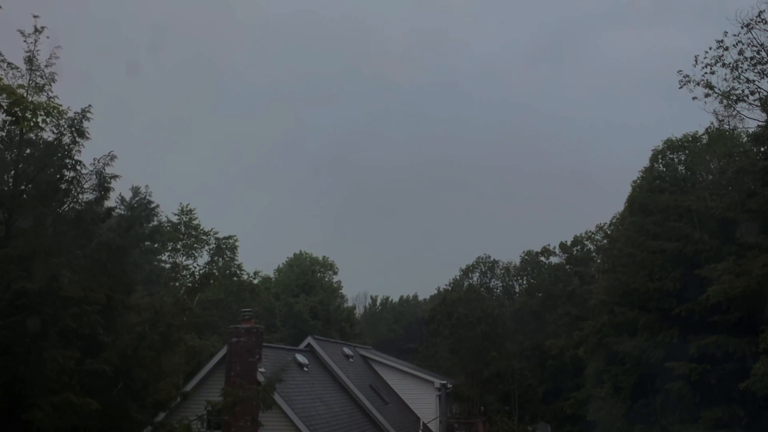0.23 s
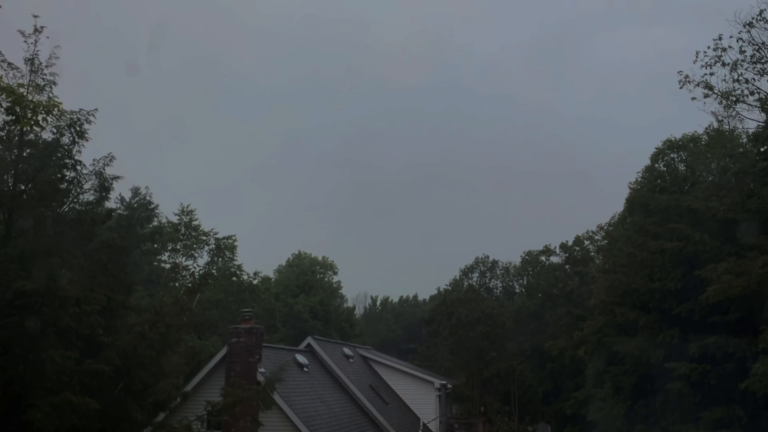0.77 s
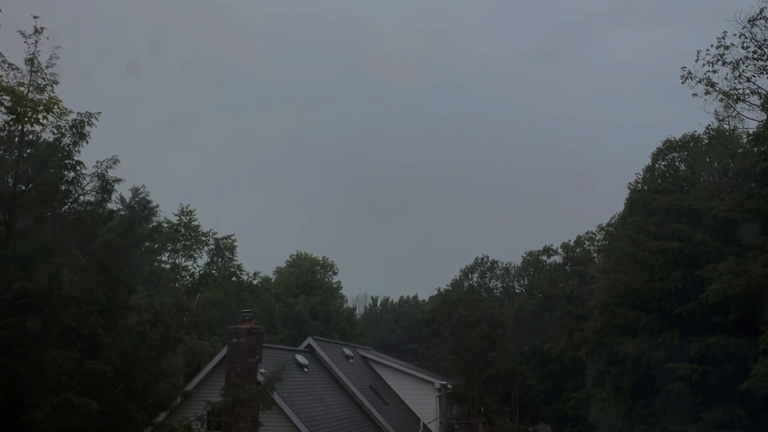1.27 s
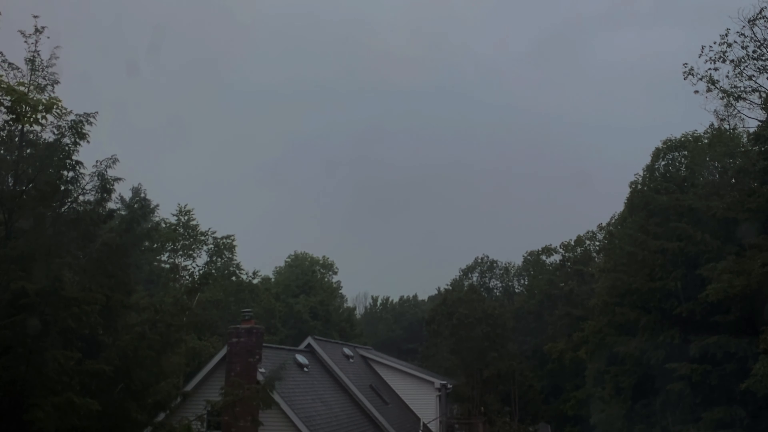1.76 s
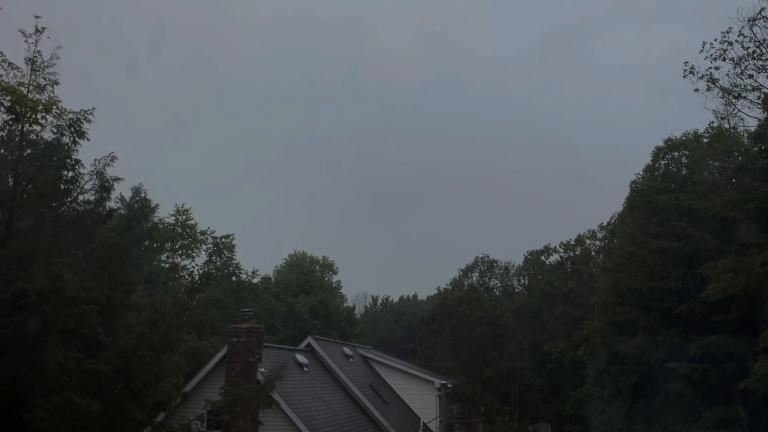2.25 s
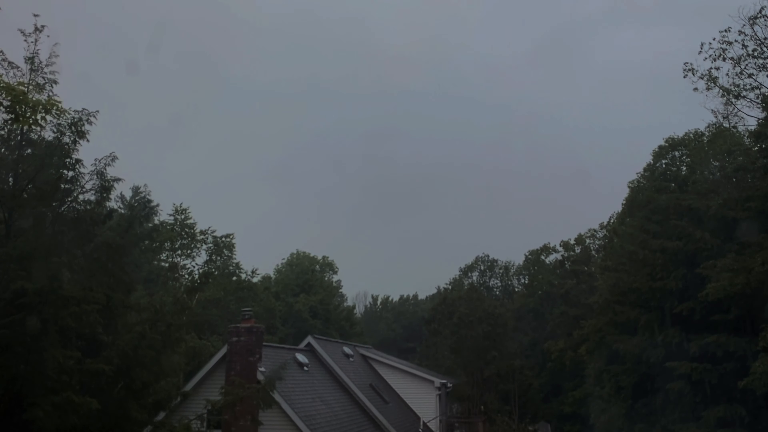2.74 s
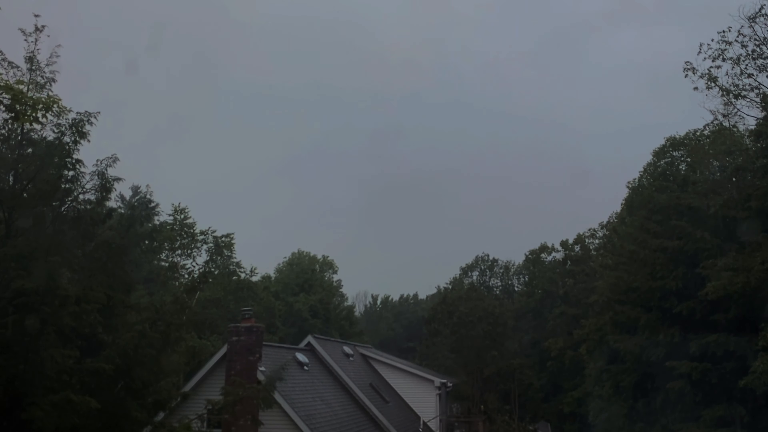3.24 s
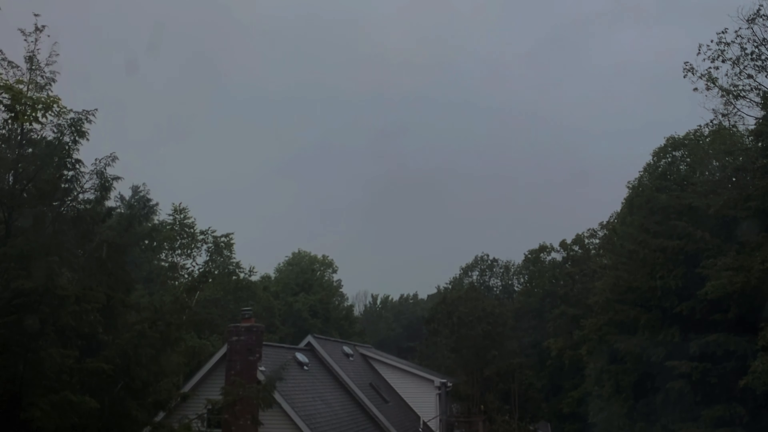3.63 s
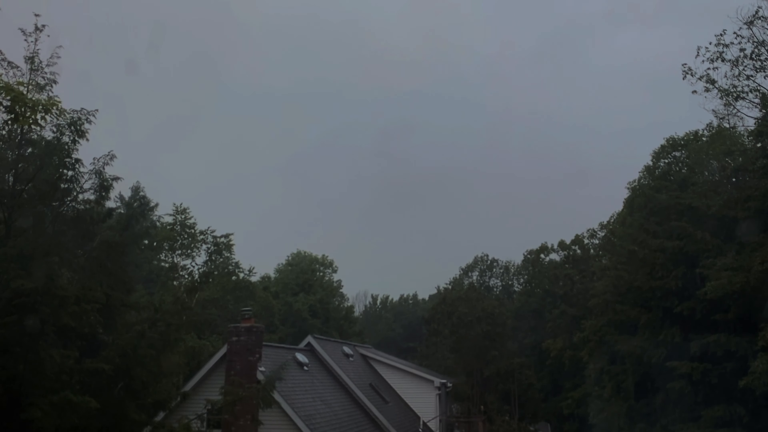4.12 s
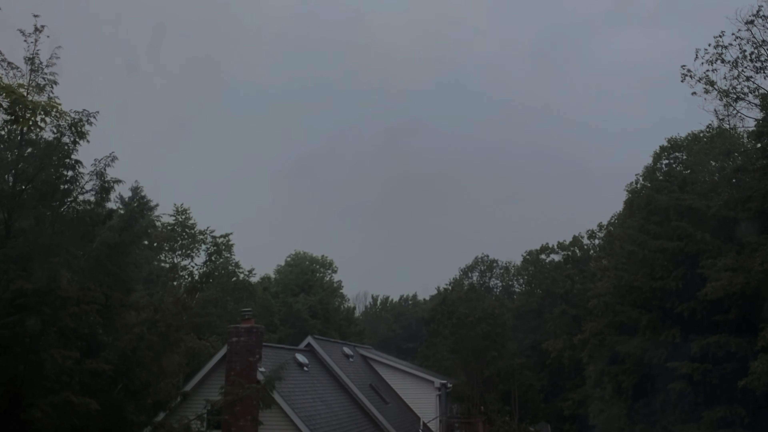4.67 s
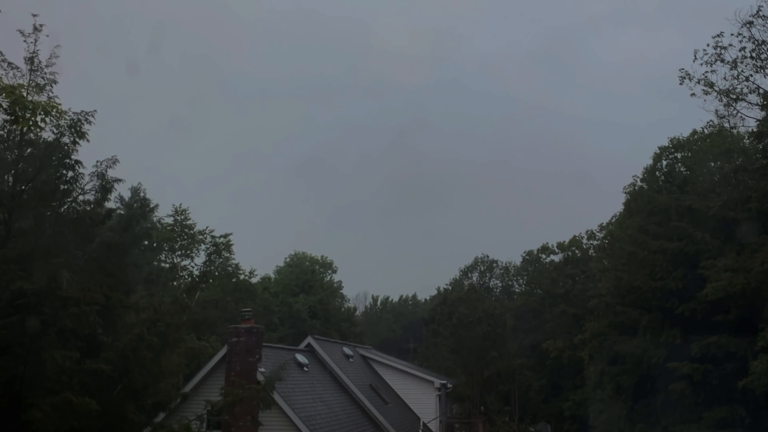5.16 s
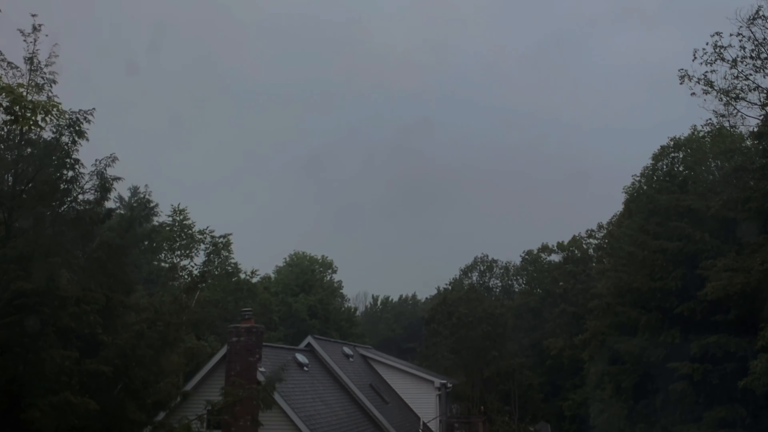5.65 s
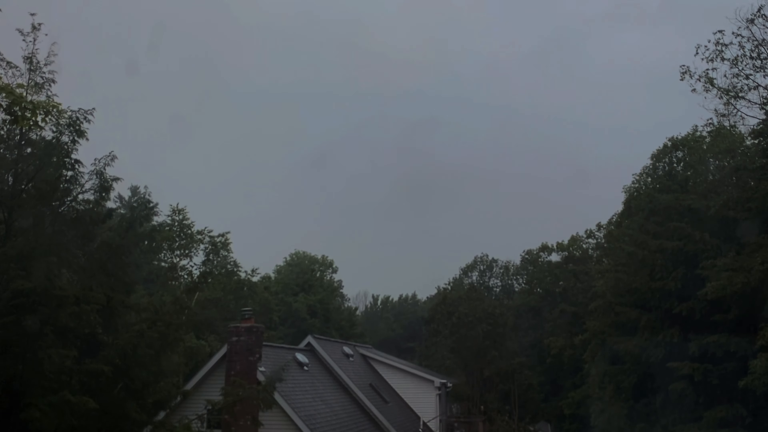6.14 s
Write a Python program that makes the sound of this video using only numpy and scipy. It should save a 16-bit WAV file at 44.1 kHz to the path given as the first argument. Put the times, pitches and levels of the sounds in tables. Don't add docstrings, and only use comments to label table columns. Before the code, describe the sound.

Muffled heavy thunder bursts through a window, rolls, sags and surges again, then fades to low rumbling above soft rain and sparse taps.

```python
import sys
import numpy as np
from scipy import signal
from scipy.fft import rfft, irfft, next_fast_len
from scipy.io import wavfile
from scipy.ndimage import uniform_filter1d, map_coordinates

SR = 44100
rng = np.random.default_rng(int(sys.argv[2]) if len(sys.argv) > 2 else 0)


def natural_amplitude(level_db):
    exponent = np.asarray(level_db, float) / 20
    return 10 ** exponent


def master_out(mix):
    frames = np.transpose(np.atleast_2d(mix))
    ceiling = np.clip(frames, -1, 1)
    pcm = np.round(ceiling * 32767).astype(np.int16)
    wavfile.write(sys.argv[1], SR, pcm)


N = 282057
HZ = np.fft.rfftfreq(next_fast_len(N + SR), 1 / SR)


def unit(x):
    return x / np.sqrt(np.mean(np.abs(x) ** 2) + 1e-20)


def along(points):
    f, v = np.transpose(points)
    return np.interp(np.log(HZ + 1), np.log(f + 1), v)


def wobble(rate_hz):
    knots = rng.standard_normal(int(N * rate_hz / SR) + 4)
    return map_coordinates(knots, [np.arange(N) * rate_hz / SR])


def bumps(modes):
    return sum(db / (1 + (2 * (HZ - hz) / width) ** 2) for hz, width, db in modes)


def band(lo_hz, hi_hz):
    return 1 / np.sqrt((1 + (lo_hz / (HZ + 1)) ** 10) * (1 + (HZ / hi_hz) ** 10))


def causal(gain):
    cepstrum = irfft(np.log(gain + 1e-6))
    half = len(cepstrum) // 2
    cepstrum[1:half] *= 2
    cepstrum[half + 1:] = 0
    return np.exp(rfft(cepstrum))


def filtered(x, response):
    m = 2 * (len(HZ) - 1)
    return irfft(rfft(x, m) * response, m)[..., :N]


def thunder():
    # start_s, treble_db
    far_air = [(0, -8), (.5, 2), (.9, 2), (1.5, -1.5), (2, 2), (2.7, -3.5), (3.2, -3), (3.6, 0), (4.2, 0),
               (4.7, -1), (5.1, -7.5), (5.4, -3), (5.8, -9.5), (6.39, -1.5)]
    far_s, far_db = np.transpose(far_air)
    treble_db = np.interp(np.arange(N) / SR, far_s, far_db)
    roll_db = peals(fade=89, distant_db=-41.5, depth_share=0, sharp_share=0)
    boom_db = peals(fade=120, distant_db=-41, depth_share=1, sharp_share=0)
    ring_db = peals(fade=123, distant_db=-45, depth_share=-0.99, sharp_share=0)
    tear_db = peals(fade=240, distant_db=-40, depth_share=-0.37, sharp_share=0.72) - 14
    swell = natural_amplitude(0.48 * wobble(22))
    drive = swarm(per_s=400, spread_db=4.0, haze=1.0)
    flutter_db = 1.1 * wobble(45) + 0.5 * wobble(14)
    edge = swarm(per_s=1500, spread_db=2.0, haze=0.84) * swell * natural_amplitude(tear_db + flutter_db)
    registers = [  # level_db, low_hz, high_hz, evening_span_s
        (roll_db - .6, 160.5, 263, 0.08),
        (ring_db + 0.5, 270, 480, .04),
        (boom_db - 8.0, 55, 150, .07),
        (boom_db - 25 + 1.5 * (wobble(4.7) - 1), 15, 55, .15)]
    roll = 0
    for db, lo_hz, hi_hz, span_s in registers:
        roll = roll + natural_amplitude(db) * evened(indoors(drive, lo_hz, hi_hz), span_s, firm=0.87)
    low = filtered(roll * swell + struck_modes(), band(16, 900))
    crack, sizzle = near_cracks()
    middle = indoors(edge * natural_amplitude(3.0) + crack, 446.4, 1196)
    treble = indoors(edge * natural_amplitude(treble_db - 6.5) + sizzle, 1200, 4200)
    return low + middle + treble


def peals(fade, distant_db, depth_share, sharp_share):
    # start_s, length_s, strength_db, depth_db,
    # sharpness_db
    stretches = [(0.0, 0.0072, -40, 3.5, 14), (0.258, 0.026, -55, -14, 9), (.335, .18, -51.5, 14.5, 4.5),
                 (0.53, 0.12, -18.5, 2.5, -12), (0.675, 0.041, -16, 1, -8), (0.747, 0.044, -14, 2.5, -7),
                 (0.813, .11, -14.5, 1, -3.5), (0.975, .06, -23, -1.5, -1.5),
                 (1.125, 0.081, -31, 2.5, 5.5), (1.298, 0.041, -24, 2, -0.5), (1.475, .027, -25.5, 1, -6),
                 (1.504, 0.23, -35.5, 5, 6), (1.701, 0.062, -45.5, -12, 3), (1.758, 0.069, -33, 2.5, -3),
                 (1.907, 0.051, -23, 0, -6), (2.019, .094, -42, 0.5, 5.5), (2.185, 0.051, -30, 0.5, -8),
                 (2.286, 0.068, -28.5, 2.5, -5.5), (2.395, .03, -35, -2, -6), (2.496, 0.096, -38.5, 2, -5),
                 (2.688, 0.022, -25, 1.5, -1), (2.86, 0.16, -36, 1.5, -7.5),
                 (2.985, 0.04, -40.5, -11.5, 3.5), (3.022, 0.15, -31.5, 2.5, -0.5),
                 (3.393, .02, -32, 1.5, 2.5), (3.414, .09, -20.5, 4.5, -8.5),
                   (3.485, 0.032, -18.5, 6, -10), (3.522, .11, -20, 1, -8), (3.661, 0.13, -18.5, 2.5, -7),
                   (3.819, 0.071, -21, 3.5, -3.5), (3.906, 0.18, -22, 1.5, -6),
                   (4.105, 0.18, -25, 2.5, -0.5), (4.334, 0.13, -27.5, 2.5, -2.5),
                   (4.456, 0.1, -27.5, 1, -1.5), (4.574, 0.044, -27, 3, -2), (4.655, .12, -32.5, 3.5, -3),
                   (4.848, 0.13, -35.5, 1, 7), (5.054, 0.044, -34, 4.5, 8.5), (5.098, .08, -26.5, 6, 2.5),
                   (5.197, 0.083, -24, 7.5, -0.5), (5.265, 0.034, -26, 4.5, -0.5),
                   (5.469, .06, -32, -1.5, 2.5), (5.572, 0.093, -33, 5.5, 6.5),
                   (5.66, 0.083, -33, 1.5, 2.5), (5.78, 0.22, -41, 5, 3.5), (6.06, 0.1, -47, 14, -10),
                   (6.234, 0.055, -32, 2.5, -5.5), (6.331, .04, -31.5, -1, -6)]
    rise_db_per_s, sag_db_per_s = 1101.5, -2.5
    t = np.arange(0, N / SR, .002)
    s, length, db, depth_db, sharp_db = np.transpose(stretches)[:, :, None]
    db = db + depth_share * depth_db + sharp_share * sharp_db
    db = db - rise_db_per_s * np.maximum(s - t, 0)
    db = db - sag_db_per_s * np.clip(t - s, 0, length)
    db = db - fade * np.maximum(t - s - length, 0)
    power = np.sum(natural_amplitude(2 * db), axis=0) + natural_amplitude(2 * distant_db)
    return np.interp(np.arange(N) / SR, t, 10 * np.log10(power))


def swarm(per_s, spread_db, haze):
    draw = rng.random((3, N))
    size = natural_amplitude(-spread_db * np.log(draw[1] + 0.17)) * np.sign(draw[2] - .5)
    shocks = unit((draw[0] < per_s / SR) * size)
    scatter = rng.standard_normal((2, N))
    return unit(np.array([shocks + haze * scatter[0], .5 * np.roll(shocks, 90) + scatter[1]]))


def indoors(drive, lo_hz, hi_hz):
    # freq_hz, level_db (per Hz)
    pane = [(12, -47), (20, -18.5), (76, -3), (140, -9), (220, 0), (256, 2.5), (318, 2.5), (362, -14),
            (421, -9.5), (511, -23), (663, -15.5), (805, -25.5), (1020, -28), (1510, -40.5), (3500, -60.5),
            (4550, -91), (7700, -120)]
    # freq_hz, width_hz, lift_db
    room = [(77.4, 13, -3.5), (118, 83, 7), (170, 3.5, 10), (220.2, 9.9, 6.5), (226.7, 8, 11),
            (323.45, 13.4, 11), (389.3, 29, 9), (414.6, 4.1, 13), (457, 3.2, 10), (639, 6.7, 7),
            (670, 7.9, -1), (900, 46, 6.5), (1022, 130, 5), (1320, 10, 10)]
    # freq_hz, likeness (0 to 1)
    likeness = [(30, 0.96), (110, 0.86), (210, 0.92), (400, 0.7), (600, 0.65), (1100, 0.27), (1800, 0.31),
                (3000, 0.37)]
    passed = natural_amplitude(along(pane) + bumps(room))
    return ports(drive, passed * band(lo_hz, hi_hz), along(likeness))


def ports(drive, gain, alike):
    # freq_hz, width_hz, lift_db
    opposed = [(110, 40, -5.5), (233, 20, 3), (300, 30, -3.5), (423, 10, 2.5)]
    turn = np.arccos(np.clip(alike, 0, .995)) / 2
    gain = unit(gain)
    mid = filtered(drive[0], causal(gain * np.cos(turn)))
    side = filtered(drive[1], causal(gain * np.sin(turn) * natural_amplitude(bumps(opposed))))
    return np.array([mid + side, mid - side])


def evened(x, span_s, firm):
    size = round(span_s * SR)
    power = uniform_filter1d(np.mean(x ** 2, axis=0), size)
    power = uniform_filter1d(power, size)
    return unit(x / (np.abs(power) + 1e-9) ** (firm / 2))


def struck_modes():
    # start_s, peak_db, pitch_hz, t60_s
    strikes = [(.011, -28, 260, 0.092), (.255, -31, 328, 0.17), (.519, -9, 124.2, 0.16),
               (.552, -12.5, 318, 0.14), (.609, -5.5, 118, .13), (.687, -8.5, 334, 0.12),
               (.747, -2.5, 303.4, 0.11), (.848, -5, 288, .15), (.865, -9, 425.2, 0.47),
               (.898, -6.5, 204.3, 0.25), (.971, -8.5, 423, 0.22), (1.021, -7, 309, 0.1),
               (1.15, -19, 105, 0.13), (1.31, -14.5, 319.4, 0.32), (1.47, -12.5, 320.6, 0.29),
               (1.908, -11, 145, .12), (1.947, -9.5, 110, 0.09), (2.202, -16.5, 310.4, 0.22),
               (2.35, -20.5, 223.5, 0.17), (2.73, -12.5, 110, 0.07), (2.991, -21, 414, .5),
               (3.135, -23.5, 233, 1), (3.415, -10, 170, .19), (3.502, -11, 72.8, 0.32),
               (3.551, -11, 197, 0.13), (3.591, -5.5, 174, .15), (3.665, -8.5, 322, 0.16),
               (3.838, -8, 323.2, 0.33), (5.115, -21.5, 90.4, .1), (5.29, -15.5, 110, 0.14)]
    body = np.zeros((2, N))
    t = np.arange(SR // 4) / SR
    for s, db, hz, t60 in strikes:
        decay = natural_amplitude(-60 * t / t60) * np.cos(2 * np.pi * t)
        swing = decay * (1 - np.exp(-t / 0.0043)) * np.sin(2 * np.pi * hz * t)
        body[:, round(s * SR):][:, :len(t)] += natural_amplitude(db - 2.5) * swing * [[1.06], [.94]]
    return body


def near_cracks():
    # start_s, crack_db, sizzle_over_crack_db
    shocks = [(0.004, -40.5, -0.5), (0.251, -39.5, 15.5), (0.4, -50, 14), (0.44, -53, 18.5),
              (0.475, -49.5, 19.5), (0.519, -29.5, -14.5), (0.687, -36, -7.5), (0.747, -27.5, -17),
              (0.848, -35.5, 5.5), (0.973, -32, -17), (1.022, -34.5, -8), (1.151, -38, -4), (1.31, -40, 4),
              (1.471, -29, -11), (1.911, -20.5, -34), (1.95, -34.5, -24), (2.09, -48, 16.5),
              (2.696, -33, 6), (2.993, -57, 5), (3.5, -29, -19.5), (3.55, -27, -10), (3.79, -31.5, -7),
              (4.09, -37.5, -8), (4.228, -40.5, -5), (5.113, -34.5, -24), (5.242, -43.5, -7),
              (5.599, -35, -11)]
    rise_s, t60_s = 0.006, 0.14
    crack, sizzle = np.zeros((2, 2, N))
    t = np.arange(SR // 4) / SR
    envelope = natural_amplitude(-60 * t / t60_s) * (1 - np.exp(-t / rise_s))
    for s, db, sizzle_db in shocks:
        echoes = envelope * rng.standard_normal((2, len(t)))
        crack[:, round(s * SR):][:, :len(t)] += natural_amplitude(db - 2.5) * echoes
        sizzle[:, round(s * SR):][:, :len(t)] += natural_amplitude(db + sizzle_db - 14) * echoes
    return crack, sizzle


def rattle(shaking):
    force = np.sqrt(np.abs(uniform_filter1d(shaking[0] ** 2, size=400)))
    buzz_gain = natural_amplitude(bumps([(11700, 450, 40), (12230, 450, 39)]))
    buzz = filtered(rng.standard_normal(N), unit(buzz_gain))
    return natural_amplitude(-65.5) * force * buzz * np.array([[1], [-.8]])


def rain():
    # freq_hz, level_db (per Hz)
    spectrum = [(290, -30), (500, -1), (762, -8.5), (877, -8.5), (1030, -2), (1150, -8), (2060, -14),
                (2250, -17), (2420, -17), (2810, -17), (4160, -16), (5000, -20), (5600, -28), (7160, -37.5),
                (12100, -120)]
    eases_db_per_s = 0.42
    grain_db = 0.99 * wobble(30) + 0.89 * wobble(400)
    fizz = rng.standard_normal((2, N)) * natural_amplitude(grain_db)
    gain = natural_amplitude(along(spectrum))
    gain = gain / np.sqrt(np.mean((gain * band(2500, 4200)) ** 2))
    mid, side = filtered(fizz, gain) * [[.85], [.55]]
    level_db = -64.3 - eases_db_per_s * np.arange(N) / SR
    return natural_amplitude(level_db) * np.array([mid + side, mid - side])


def drops():
    # start_s, level_db
    glass_hits = [
        (1.2404, -56.5),
        (3.0952, -54),
        (3.721, -54),
        (4.1104, -54.5),
    ]
    # start_s, level_db, t60_s
    sill_hits = [
        (0.0087, -38.5, 0.034),
        (0.1755, -50.5, 0.083),
        (1.1595, -45.5, 0.034),
        (5.4476, -49, 0.032),
        (5.5123, -31.5, 0.022),
        (5.8852, -70, 0.026),
    ]
    # freq_hz, width_hz, level_db
    glass_modes = [(6600, 620, -4.5), (8170, 170, 5), (10000, 400, -12.5), (11680, 800, -1),
                   (15300, 500, -13)]
    # freq_hz, level_db (per Hz)
    sill_spectrum = [(400, -30), (700, 0.5), (1600, 3.5), (2500, -1), (4000, -7), (7500, -20),
                     (9000, -35.5), (11000, -24), (15500, -42.5), (17000, -74.5)]
    tick, tap = np.zeros((2, 2, N + SR))
    t = np.arange(SR // 5) / SR
    for s, db in glass_hits:
        fade = natural_amplitude(-60 * t / 0.049) + natural_amplitude(-12.5 - 60 * t / .22)
        noise = rng.standard_normal(len(t))
        tick[:, round(s * SR):][:, :len(t)] += natural_amplitude(db - 7.5) * fade * noise * [[1], [.9]]
    for s, db, t60 in sill_hits:
        noise = rng.standard_normal((2, len(t)))
        noise = noise + noise[0]
        fade = natural_amplitude(db - 3.5 - 60 * t / t60) * (1 - np.exp(-t / 0.001))
        tap[:, round(s * SR):][:, :len(t)] += fade * noise
    ring = sum(natural_amplitude(db) / np.sqrt(1 + (2 * (HZ - hz) / width) ** 2) for hz, width, db in glass_modes)
    on_glass = filtered(tick[:, :N], causal(unit(ring * band(5500, 15500))))
    on_sill = filtered(tap[:, :N], causal(unit(natural_amplitude(along(sill_spectrum)))))
    return on_glass + on_sill


def hiss():
    # freq_hz, level_db (per Hz)
    spectrum = [(5000, -43), (6000, 1.5), (8200, 2), (9000, -24.5), (9800, 5.5), (12500, -7.5),
                (14000, -20), (15500, -17.5), (16500, -56)]
    noise = filtered(rng.standard_normal((2, N)), unit(natural_amplitude(along(spectrum))))
    mid, side = noise * natural_amplitude([[-90], [-88]])
    return np.array([mid + side, mid - side])


def scene():
    sky = thunder()
    return sky + rattle(sky) + rain() + drops() + hiss()


def top_cut(x):
    return signal.sosfilt(signal.butter(12, 15800, fs=SR, output="sos"), x)


def record(dry):
    # freq_hz, left_over_right_db
    level_lean = [(60, -0.5), (98, -1), (160, 1), (260, 2), (430, -0.5), (700, -4), (1150, -3.5),
                  (1890, -1), (3090, 2), (5060, 0)]
    # freq_hz, left_lead_rad
    phase_lead = [(0, 0), (300, 0), (430, 0), (1030, -1.2), (1550, 1.1), (1810, -1.9), (2240, -1.05),
                  (2580, -3.5), (2840, -5.5), (3270, -3.5), (3700, -19), (3960, -12.5), (4310, -11),
                  (5000, -24), (5250, -5)]
    lean = natural_amplitude(along(level_lean) / 2) * np.exp(.5j * along(phase_lead))
    heard = filtered(dry, np.array([lean, 1 / lean]))
    heard = heard / (1 + np.abs(heard / .66) ** 4) ** .25
    return top_cut(heard)


dry = scene()
out = record(dry)
master_out(out)
```